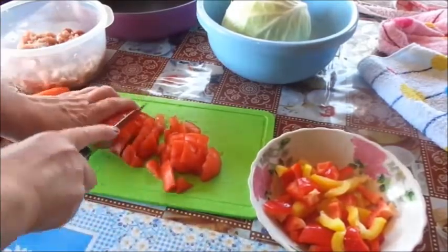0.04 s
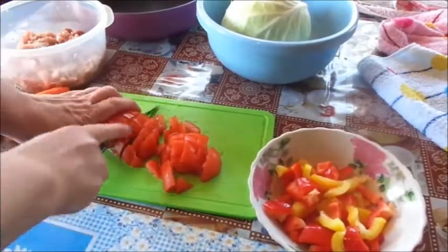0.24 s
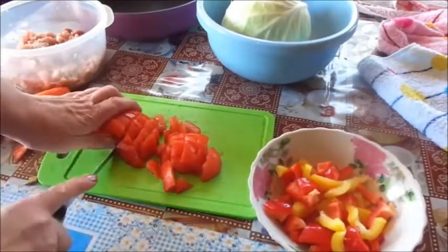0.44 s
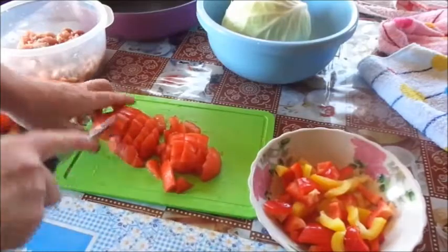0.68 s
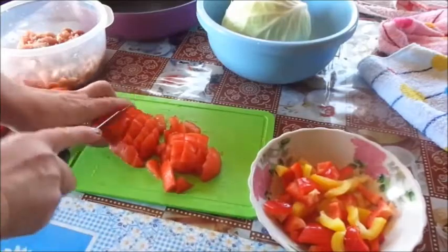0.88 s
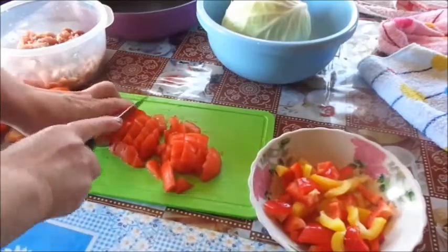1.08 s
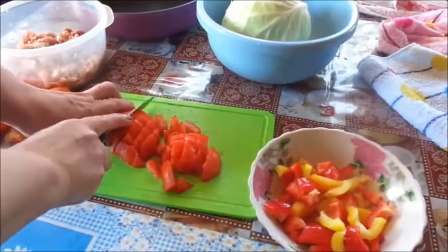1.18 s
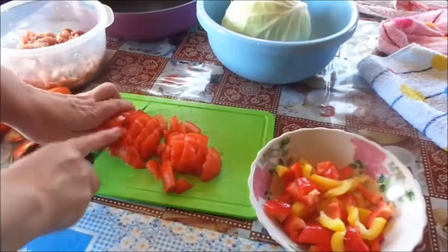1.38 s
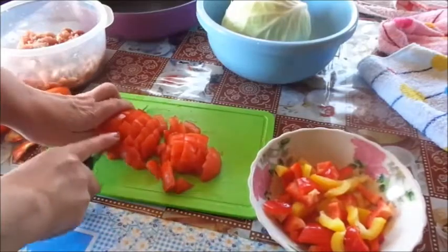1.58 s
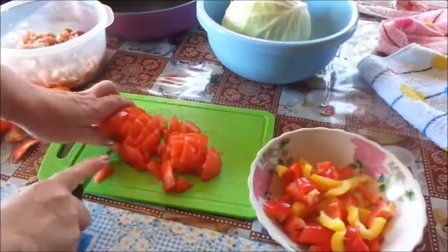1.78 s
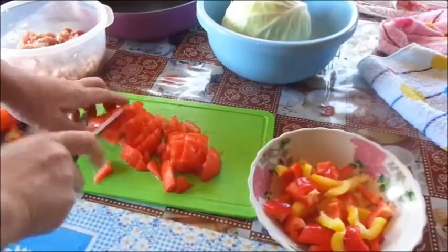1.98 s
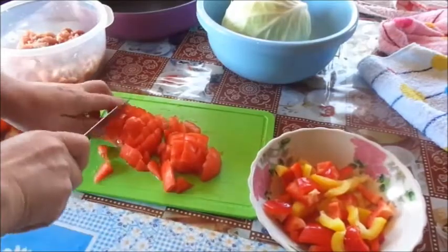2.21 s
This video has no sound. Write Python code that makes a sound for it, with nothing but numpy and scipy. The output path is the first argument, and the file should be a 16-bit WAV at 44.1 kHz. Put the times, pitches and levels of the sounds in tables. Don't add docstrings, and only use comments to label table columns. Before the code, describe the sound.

A kitchen knife dices a ripe tomato on a thin plastic board, wet slices and sharp taps

```python
import sys
import numpy as np
from scipy import signal
from scipy.fft import rfft, irfft, next_fast_len
from scipy.io import wavfile
from scipy.ndimage import map_coordinates

SR = 44100
rng = np.random.default_rng(int(sys.argv[2]) if len(sys.argv) > 2 else 0)


def field_ratio(decibels):
    return 10 ** (np.asarray(decibels, dtype=float) / 20)


def dump_mix(stems):
    frames = np.atleast_2d(stems).T
    limited = np.clip(frames, -1, 1)
    pcm = np.round(limited * 32767).astype(np.int16)
    wavfile.write(sys.argv[1], SR, pcm)


N = 99225


def unit(x):
    return x / np.sqrt(np.mean(x ** 2) + 1e-20)


def noise():
    return rng.standard_normal(N)


def along(points, hz):
    point_hz, value = np.transpose(points)
    return np.interp(np.log(hz + 1), np.log(point_hz + 1), value)


def filtered(x, response):
    size = next_fast_len(len(x) + SR // 2)
    hz = np.fft.rfftfreq(size, 1 / SR)
    return irfft(rfft(x, size) * response(hz), size)[:len(x)]


def rings(peaks):
    def response(f):
        total = 0
        for k, (center, width, db) in enumerate(peaks):
            total = total + (-1) ** k * field_ratio(db) * 1j * f * width / (center * center - f * f + 1j * f * width)
        return total
    return response


def wobble(rate):
    knots = rng.standard_normal(int(N * rate / SR) + 4)
    return map_coordinates(knots, [np.arange(N) * rate / SR])


# pitch_hz [Hz], level_db [dB per Hz]
HUSH_COLOUR = [(12, -51), (20, -2.5), (32, -15.5), (259, -7), (288, -4.5), (338, -6), (874, -4.5),
               (971, -4), (11000, -16), (14300, -80), (22000, -120)]


def hush():
    low, high = (filtered(noise(), lambda f: field_ratio(along(HUSH_COLOUR, f))) for _ in range(2))
    low_share = lambda f: 1 / (1 + (f / 2500) ** 2)
    low = filtered(low, lambda f: np.sqrt(low_share(f)))
    low = low * field_ratio(0.65 * wobble(6.34) + 0.27 * wobble(25.1))
    high = filtered(high, lambda f: np.sqrt(1 - low_share(f)))
    return field_ratio(-65.5) * unit(low + high)


def slips():
    slips_per_s, spread_db = 3000, 2
    caught = rng.random(N) < slips_per_s / SR
    strength = noise() * field_ratio(spread_db * rng.exponential(size=N))
    return unit(caught * strength) + 0.89 * noise()


# time_s [s], level_db [dB], blade_over_board_db [dB], wet_hiss_db [dB]
STROKES = [
    [(.06, -68, -4, 10), (.11, -65, -10, 8.5), (.16, -56, -0.5, 10.5), (.185, -52, 0, 9.5),
     (.198, -55, 0, 2)],
    [(.29, -58.5, -8, 5), (.35, -50, 2.5, 1), (.39, -47.5, -1, 2), (.406, -44.5, -10, -2),
     (.44, -54.5, -4, -8), (.48, -58.5, -9, 1), (.53, -83, -4, -3)],
    [(1.13, -75.5, 0, 8), (1.2, -59.5, 0.5, 8.5), (1.23, -53, 7.5, 8), (1.25, -58.5, 0, 10),
     (1.275, -75, 2, 8), (1.3, -78, 0, 2)],
    [(1.34, -75, -8, 13), (1.4, -62.5, -5, 13.5), (1.43, -54, -2, 6.5), (1.45, -50, -4.5, 0.5),
     (1.48, -70, -3, -8), (1.495, -58.5, -8, 18), (1.503, -42.5, -2, 0)],
    [(1.6, -72.5, -6, 2), (1.65, -57.5, 1.5, 2), (1.69, -54.5, 1, 5.5), (1.725, -57, -10, 2.5),
     (1.765, -71, -8, 0), (1.81, -93, -5, -4)],
]
# pitch_hz [Hz], width_hz [Hz], level_db [dB]
STROKE_BLADE = [
    [(2920, 590, 4), (4000, 540, -3)],
    [(2420, 470, -1.5), (2920, 480, 1.5), (4400, 680, -4.5)],
    [(2870, 650, 0), (3990, 550, -0.5), (5270, 700, -2)],
    [(2910, 650, -1.5), (4420, 600, 0.5)],
    [(2870, 610, -0.5), (4210, 650, 1), (5470, 1200, -4.5)],
]
# pitch_hz [Hz], width_hz [Hz], level_db [dB]
RUBBED_BOARD = [(331, 177, -3), (485, 122, 1), (937, 300, -2), (1360, 336, -1), (1864, 660, -4)]
# pitch_hz [Hz], level_db [dB per Hz]
WET_HISS = [(200, -66), (1000, -17), (3000, 5), (6000, 2), (9000, -0.5), (11000, -7)]


def stroke(points, blade_peaks):
    fade_in = (points[0][0] - .02, -90, 0, 0)
    fade_out = (points[-1][0] + 0.007, -90, 0, 0)
    time_s, *curves = np.array([fade_in, *points, fade_out]).T
    level_db, blade_db, hiss_db = (np.interp(np.arange(N) / SR, time_s, curve) for curve in curves)

    board = unit(filtered(slips(), rings(RUBBED_BOARD))) * field_ratio(2.1 * wobble(70))
    blade = unit(filtered(slips(), lambda f: rings(blade_peaks)(f) ** 2)) * field_ratio(1.05 * wobble(70))
    hiss = unit(filtered(slips(), lambda f: field_ratio(along(WET_HISS, f))))
    table = unit(filtered(noise(), lambda f: rings([(71, 120, 0)])(f) ** 2))

    edge = board * field_ratio(-blade_db / 2) + blade * field_ratio(blade_db / 2) + field_ratio(hiss_db - 8) * hiss
    table_db = -83 + 0.52 * (level_db + 55)
    return field_ratio(level_db - 4.5) * edge + field_ratio(table_db) * table


TAP_START = [.2013, .4091, 1.5063]
# peak_db [dB], blade_delay_ms [ms], board_delay_ms [ms], blade_over_board_db [dB]
TAP_BALANCE = [
    (-14.5, 0, 0.53, -5),
    (-23, 0.018, 0.33, 5.5),
    (-21, 0.856, 0.088, 0),
]
# pitch_hz [Hz], width_hz [Hz], level_db [dB]
TAPPED_BOARD = [
    [(986, 790, -7), (1470, 520, 0), (1925, 430, -1.5)],
    [(1390, 540, -1.5), (2070, 400, 4.5)],
    [(1205, 950, -3.5), (1980, 1100, 0)],
]
# pitch_hz [Hz], width_hz [Hz], level_db [dB]
TAPPED_BLADE = [
    [(2690, 520, -11.5), (3750, 450, 1), (4530, 290, -1.5), (5570, 490, 0.5), (6340, 590, -3.5),
     (8560, 2100, -6)],
    [(2880, 740, -3), (3810, 270, -0.5), (4040, 330, -0.5), (6040, 800, -11.5), (8240, 540, -10.5)],
    [(2500, 440, -10.5), (3030, 240, -0.5), (3990, 420, -1.5), (5370, 460, -6.5), (6700, 1200, -12)],
]
THUD_LEVEL = [1, 3.5, 0]
# pitch_hz [Hz], width_hz [Hz], level_db [dB]
BOARD_THUD = [(343.5, 102, -5.5), (486, 100, -1), (616, 125, -11.5)]


def tap(start_s, balance, board_peaks, blade_peaks, thud_db):
    peak_db, blade_ms, board_ms, blade_db = balance
    low_cut_hz, contact_s = 138, .00004

    def response(f):
        blow = (1j * f / (low_cut_hz + 1j * f)) ** 2 / (1 + 2j * np.pi * f * contact_s) ** 2
        late = lambda ms: np.exp(-2j * np.pi * f * (start_s + ms / 1000))
        blade = field_ratio(blade_db) * late(blade_ms) * rings(blade_peaks)(f)
        board = late(board_ms) * (rings(board_peaks)(f) + field_ratio(thud_db) * rings(BOARD_THUD)(f))
        return blow * (blade - board)

    x = filtered(np.arange(N) == 0, response)
    return field_ratio(peak_db) * x / np.abs(x).max()


TICK_START = [.782, .61, 1.622, 2.048, 2.228, 1.433, 1.765, 1.255, .87]
# level_db [dB], pitch_hz [Hz], life_s [s]
TICK_SOUND = [(-59, 3070, .008), (-67, 2800, 0.015), (-57, 4200, .002), (-64, 2540, 0.0052),
              (-65, 820, .008), (-45, 1630, 0.0028), (-61.5, 265, 0.0095), (-59, 520, .02),
              (-65.5, 300, 0.027)]


def ticks():
    t = np.arange(N) / SR
    total = 0
    for start_s, (level_db, hz, life_s) in zip(TICK_START, TICK_SOUND):
        decay = (t > start_s) * np.exp(-np.abs(t - start_s) / life_s)
        total = total + field_ratio(level_db) * decay * unit(filtered(noise(), rings([(hz, hz * 0.13, 0)])))
    return total


# delay_s [s], level_db [dB]
WALL_ECHOES = [(.0043, -13), (.0068, -6), (.0092, -14), (0.0145, -18), (.0192, -24), (.0245, -27),
               (0.03, -16.5)]
# pitch_hz [Hz], t60_s [s]
TAIL_T60 = [(200, .14), (500, 0.2), (1400, 0.15), (3700, 0.18), (9700, .14)]
# pitch_hz [Hz], level_db [dB]
ROOM_TONE = [(150, 0.5), (480, -3), (800, -6), (1600, 0.5), (2600, -6.5), (4000, -9), (7000, -6.5),
             (11000, -6.5)]


def kitchen(x):
    tail_db, tail_delay_s = 1, .004
    scatter_db, scatter_t60_s = 2, 0.031

    hz, t, spectrum = signal.stft(rng.standard_normal(SR // 2), SR, nperseg=128)
    decay = field_ratio(-60 * t / along(TAIL_T60, hz)[:, None])
    tail = signal.istft(spectrum * decay, SR, nperseg=128)[1]
    answer = np.pad(field_ratio(tail_db) * tail / np.linalg.norm(tail), (round(tail_delay_s * SR), 0))

    near = np.diff(rng.standard_normal(len(answer) + 1))
    near = near * field_ratio(-60 * np.arange(len(answer)) / SR / scatter_t60_s)
    answer = answer + field_ratio(scatter_db) * near / np.linalg.norm(near)
    for delay_s, level_db in WALL_ECHOES:
        answer[round(delay_s * SR)] += field_ratio(level_db)
    return filtered(signal.fftconvolve(x, answer)[:N], lambda f: field_ratio(along(ROOM_TONE, f)))


def scene():
    taps = [tap(*parts) for parts in zip(TAP_START, TAP_BALANCE, TAPPED_BOARD, TAPPED_BLADE, THUD_LEVEL)]
    small = sum(map(stroke, STROKES, STROKE_BLADE)) + ticks()
    landings = sum(hit + kitchen(hit) for hit in taps)
    mix = landings + small + field_ratio(-6.5) * kitchen(small) + hush()
    return mix[None]


def roll_off(x):
    return signal.sosfilt(signal.butter(12, 11180, fs=SR, output="sos"), x)


def record(dry):
    mix = filtered(dry[0], lambda f: f < 11150)[None] - .0003
    return roll_off(mix)


dry = scene()
out = record(dry)
dump_mix(out)
```